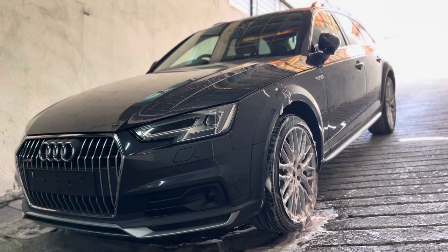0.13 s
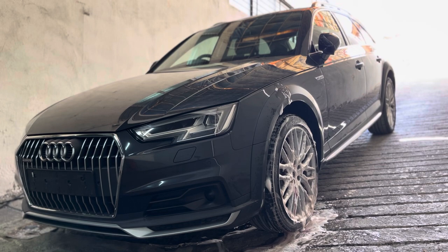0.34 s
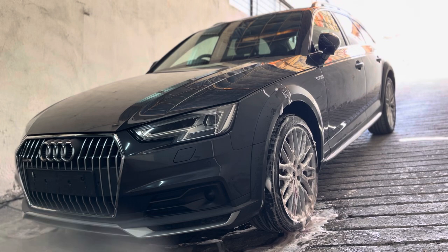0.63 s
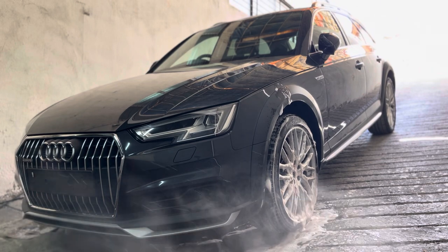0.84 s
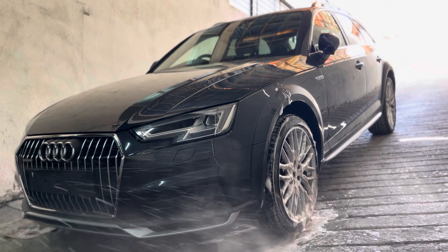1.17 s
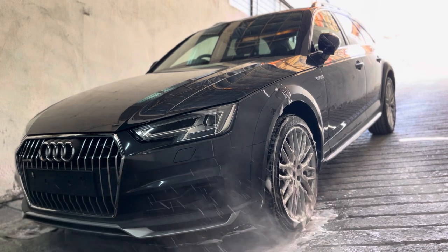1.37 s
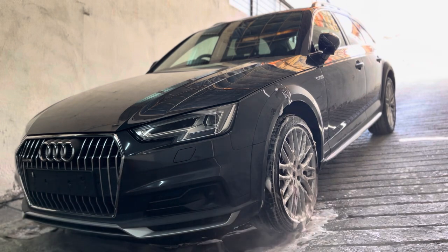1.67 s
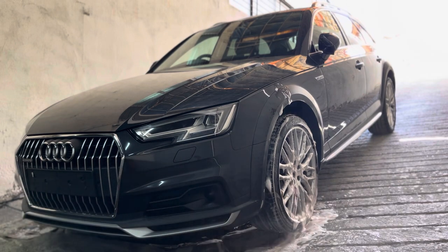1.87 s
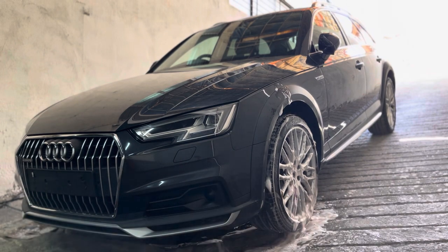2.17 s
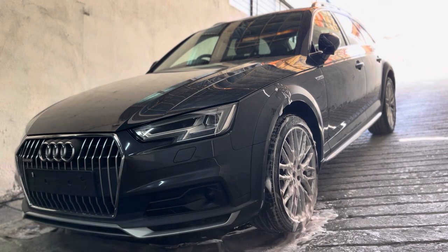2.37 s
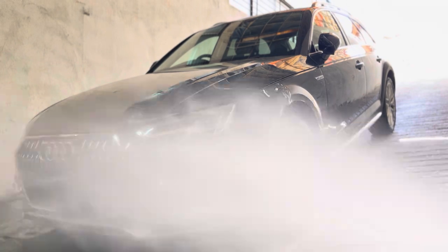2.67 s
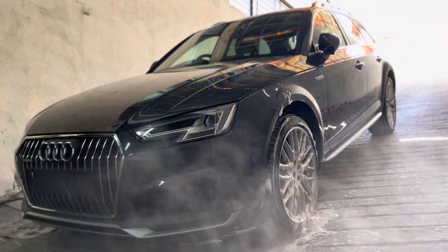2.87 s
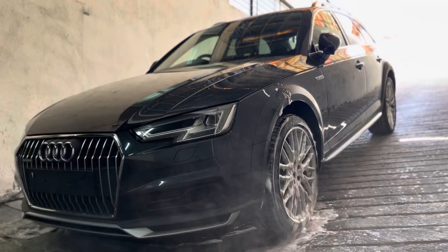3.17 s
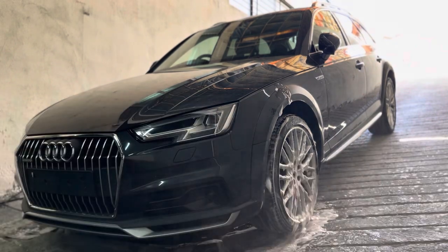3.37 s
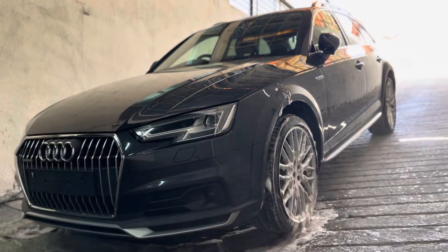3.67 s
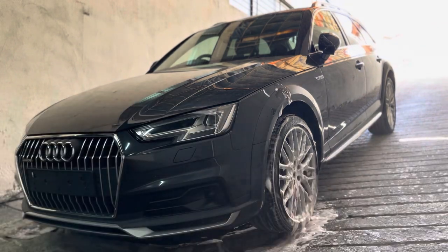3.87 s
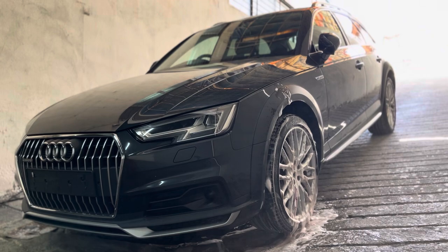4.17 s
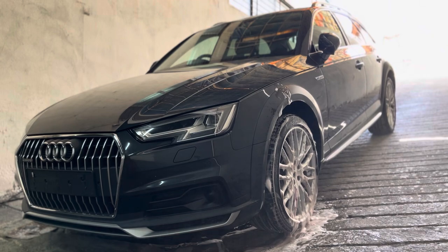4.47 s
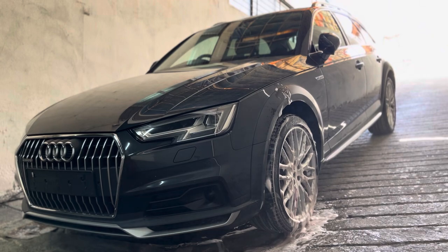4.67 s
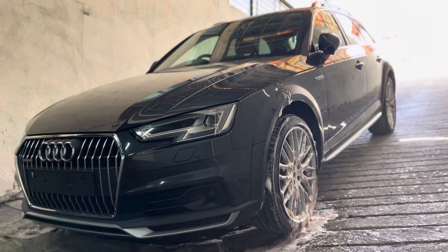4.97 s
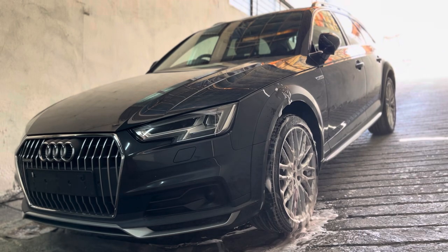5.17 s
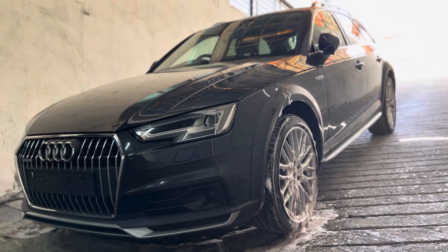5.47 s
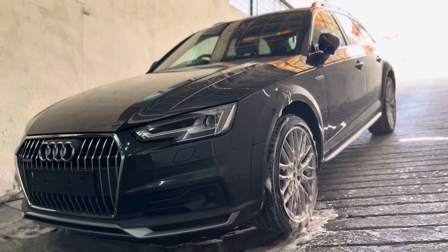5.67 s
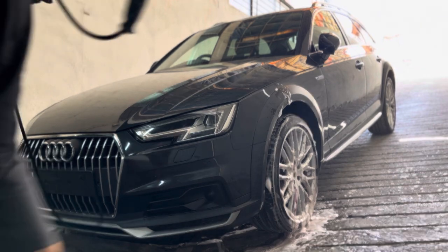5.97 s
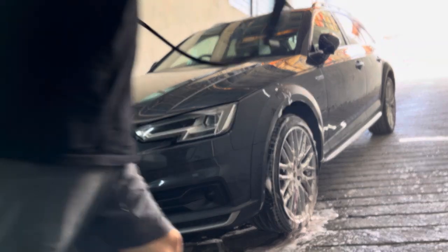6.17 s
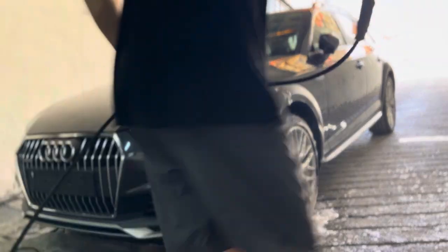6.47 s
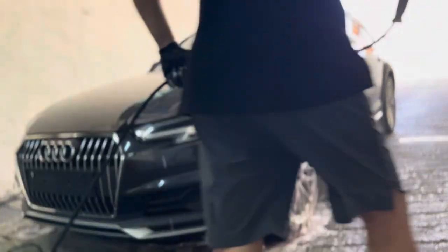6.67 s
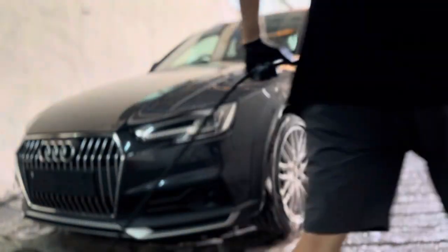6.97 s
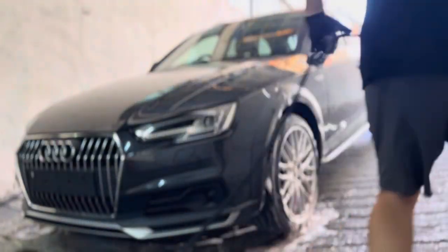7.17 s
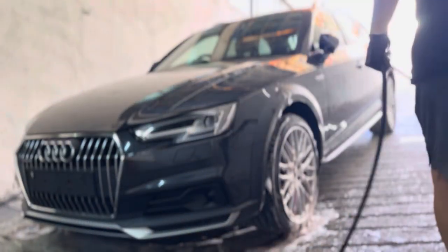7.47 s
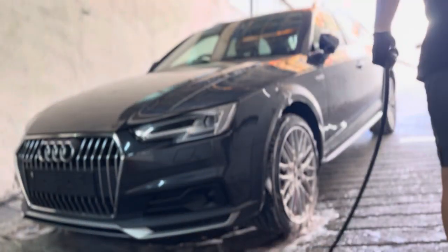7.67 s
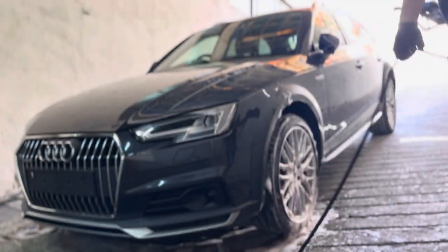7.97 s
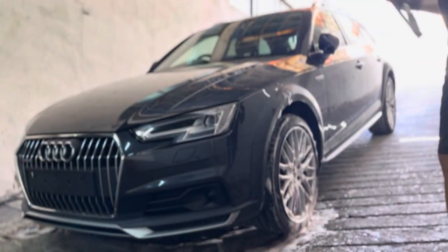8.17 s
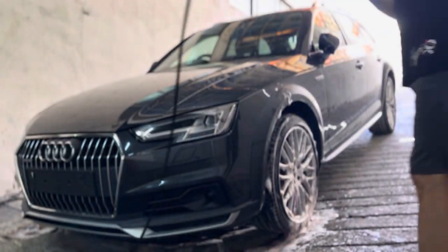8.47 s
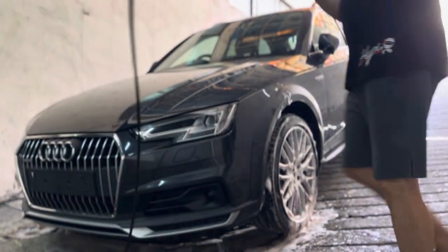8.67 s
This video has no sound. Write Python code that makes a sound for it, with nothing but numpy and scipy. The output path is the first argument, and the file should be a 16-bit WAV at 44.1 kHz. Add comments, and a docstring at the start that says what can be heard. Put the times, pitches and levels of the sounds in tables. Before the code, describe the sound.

Three short pressure-washer blasts hiss and echo in a concrete wash bay, with trigger clicks, then hose knocks and scuffs over faint distant traffic.

```python
"""Covered, echoing wash bay: a pressure washer is triggered in three bursts onto concrete.
Jet and struck floor are coloured noise, the pump is sines on multiples of its shaft speed.
Trigger and lance ring as decaying modes; hose and shoes knock and scuff as filtered noise bursts.
Engines (sines on moving pitches) and road wash pass outside; water trickles faintly.
Sparse taps make the echo; two microphone ports hear the bay with a frequency-dependent lag."""
import sys
import numpy as np
from scipy import signal
from scipy.fft import rfft, irfft, next_fast_len
from scipy.io import wavfile
from scipy.ndimage import uniform_filter1d

SR = 44100
rng = np.random.default_rng(int(sys.argv[2]) if len(sys.argv) > 2 else 0)


def unload_audio(sound):
    """Save the sound as a 16-bit wav file, at the path given as the first command line argument."""
    columns = np.transpose(np.atleast_2d(sound))
    # keep every value between -1 and 1, then stretch to whole-number steps
    steps = np.round(np.clip(columns, -1, 1) * 32767)
    wavfile.write(sys.argv[1], SR, steps.astype(np.int16))


N = 388771

# road wash colour: freq_hz, density_db
ROAD_COLOUR = [(25, -27), (40, -22), (55, 1.5), (100, -9.5), (200, -17.5), (450, -24.5), (700, -26.5),
               (1500, -29.5), (3000, -43), (4400, -36.5), (5600, -48), (10000, -58), (16000, -62.5)]
# road wash level: time_s, level_db
ROAD_LEVEL = [(0, -37.5), (2.5, -33.5), (3.6, -40.5), (8.82, -41)]
# passing car: time_s, speed_hz (its tone sits at 0.98 of this), level_db
CAR = [(0, 77, -39), (1, 77.75, -56.5), (2.2, 76.7, -33.5), (2.8, 71.5, -35), (3.2, 62, -57),
       (3.7, 58.3, -38), (4.5, 57.34, -38.5), (5.3, 60, -32), (5.55, 58, -66), (5.8, 58.92, -34.5),
       (6.4, 58.56, -30.5), (6.95, 58.3, -40.5), (7.25, 56.95, -38), (7.55, 56.2, -43), (8.82, 54.4, -47)]
# passing van: time_s, firing_hz, level_db
VAN = [(0, 46.77, -39.5), (1.2, 47.87, -37.5), (2.4, 42.4, -52), (3.7, 38.24, -39)]
# passing truck: time_s, firing_hz, level_db
TRUCK = [(3.5, 87.4, -60.5), (4.7, 97.44, -52.5), (5.5, 94.1, -42.5), (6.6, 91.44, -41.5), (7.3, 86.3, -50),
         (8.82, 73.4, -57.5)]
# van tones: firing_multiple, level_db
VAN_ORDERS = [(1, -5.5), (2, -3)]
# truck tones: firing_multiple, level_db
TRUCK_ORDERS = [(1, 0), (2, -11)]
# running water and dragged hose, faint hiss: time_s, level_db
TRICKLE = [(0, -64), (.15, -54.5), (.35, -85), (.45, -51.5), (.6, -66), (3.4, -71), (3.62, -58),
           (4.35, -64), (4.55, -57), (4.72, -67.5), (6.8, -70), (6.97, -57.5), (7.15, -80.5)]
# trickle colour: freq_hz, density_db
WATER = [(1500, -5), (3000, 1.5), (4500, 2), (6000, -3.5), (10000, -4), (13000, -4.5)]
# echo decay of the bay: freq_hz, t60_s
BAY = [(120, 2), (330, 1.3), (870, 1.2), (2300, 1.2), (6060, 1), (14000, .66)]
# microphone ports: freq_hz, likeness_0_1, right_lead_half_turns, left_over_right_db
PORTS = [(90, .99, 0, 0), (150, .86, 0, -4), (280, .8, 0, 1), (480, .7, -.05, 1), (850, .55, -.75, 0),
         (1550, .6, -1, -3), (1800, .65, -.22, 2), (4500, .4, -.2, 5), (6000, .5, .35, 4.5),
         (8250, 1, 1, 0), (11800, .92, 2, 0), (14900, 1, 3, 0)]
EDGE_HZ = 15800  # upper band limit

# thin bright ticks, the last an echo off the walls: start_s, peak_db, centre_hz, contact_s
TICKS = [(.449, -35, 10100, 0.0037), (0.469, -30.5, 9400, .004), (1.8727, -25.5, 10700, 0.0037),
         (6.0935, -35, 10740, 0.0051)]
# distant scrapes, mostly off the walls: start_s, peak_db, centre_hz, contact_s
SCRAPES = [(.1, -36, 3690, 0.071), (1.83, -36.5, 3700, 0.049)]
# shoe and hose scuffs on concrete: start_s, peak_db, centre_hz, contact_s
SCUFFS = [(3.788, -32, 2600, 0.012), (4.0679, -21, 3300, 0.02), (4.9691, -34, 4013, 0.014),
          (7.391, -32.5, 4590, 0.03), (7.985, -40.5, 3530, 0.031)]
# metallic taps of lance and hose fittings: start_s, peak_db, centre_hz, contact_s
TAPS = [(5.7458, -28.5, 4150, 0.0035), (5.811, -28, 3885, 0.0058), (6.2495, -14.5, 3350, 0.012),
        (7.899, -24.5, 3365, 0.017), (7.911, -29.5, 4040, 0.0098)]
# hard knocks, and the wall echo of the first at 5.918 s: start_s, peak_db, centre_hz, contact_s
KNOCKS = [(5.7718, -3, 8500, 0.0072), (5.9181, -16.5, 2430, 0.011), (8.4391, -16.5, 1050, 0.0081)]
# low thuds as hose or shoe lands: start_s, peak_db, centre_hz, contact_s
THUDS = [(5.787, -17.5, 330, 0.042), (6.251, -14, 504, 0.01), (7.902, -25.5, 210, .028),
         (8.447, -28.5, 196.9, 0.029)]
# light narrow-band pings, the last a wall echo of the knock at 8.44 s:
# start_s, peak_db, centre_hz, contact_s
PINGS = [(5.6546, -34.5, 2170, .045), (7.268, -34.5, 3800, .0064), (8.5779, -40, 3190, .01)]
# burst kinds: events, fall_below_db_per_octave, fall_above_db_per_octave, swell_db, room_db
KINDS = [(TICKS, 6, 4, -6, -12.5), (SCRAPES, 13, 19, -6, 5.3), (SCUFFS, 3.5, 5.5, 6, -6),
         (TAPS, 2.5, 8.5, -4, -5), (KNOCKS, -1.2, 8, -8, -5.5), (THUDS, 6, 5.5, -3, -1.5),
         (PINGS, 50, 40, -9, -7)]
LOW_EDGE_HZ = 370  # highest bass cut of a crack

# steel tube modes: freq_hz, level_db, t60_s
LANCE = [(1237, -6.5, 0.88), (1834, -10, 0.34), (2175, 0, 0.2), (2320, -6.5, 0.26), (2730, -3, 0.4),
         (3070, -2, 0.44), (3500, 7.5, 0.086), (3960, -1, 0.16), (4740, -7, 0.41)]
# knocks that ring the tube: start_s, level_db
STRUCK = [(5.771, -37.5), (6.251, -28.5)]

# trigger clicks: start_s, level_db
CLICKS = [(0.9048, -19.5), (0.988, -19), (1.954, -13), (2.1968, -17)]
# handle modes, nominal: freq_hz, level_db, t60_s
TRIGGER = [(2600, -2, .009), (3140, 0, .012), (3900, -8, .006)]
# latch chatter: delay_s, level_db
BOUNCES = [(0, -3), (.0026, -5.5), (.0047, -4), (0.01, -18)]
CLICK_ROOM_DB = 2.5

# jet colour: freq_hz, density_db
JET = [(600, -2.5), (1400, -4.5), (1700, -6), (2500, -0.5), (4000, -0.5), (7000, -5), (10000, -3.5),
       (12500, -7), (15000, -7)]
# struck-floor colour: freq_hz, density_db
ROAR = [(120, -19.5), (230, -17), (330, 3.5), (500, -3.5), (800, -6), (1500, -6), (3500, -33)]
# pump tones: shaft_multiple, level_db
PUMP = [(3, 5.5), (6, -8), (7, 3.5), (8, -2.5), (9, 1)]
PUMP_HZ = 46.9  # shaft
# full pulls: on_s, off_s, jet_db, start_db (re full pressure), roar_db (re jet), pump_db (re jet)
PULLS = [(0.495, 0.637, -19, -24, -8, -22), (0.988, 1.094, -19.5, -9.5, -6.5, -24),
         (2.322, 2.642, -17.5, -24, -6, -16)]
# short spits; leftover pressure can start high: on_s, off_s, jet_db, start_db (re full pressure)
SPITS = [(0.899, 1.008, -35.5, 8), (1.95, 1.971, -38, 15.5), (2.048, 2.096, -28, -27.5),
         (2.196, 2.229, -35, 13.5)]
# slack water slapping the floor: on_s, off_s, roar_db
SLACK = [(2.043, 2.172, -33.5), (2.265, 2.318, -33)]
BUILD_S, SPIT_BUILD_S, SLACK_BUILD_S = 0.13, 0.057, 0.12  # pressure build-up
SPIT_ROAR_DB = -13.5  # re jet
SLACK_START_DB, SLACK_HISS_DB = -17, -10  # re full pressure; re roar
# valve slams: start_s, level_db, pitch_hz, t60_s
SHUT = [(0.663, -17, 77, 0.2), (2.648, -15.5, 57, 0.15)]
# dull thumps of water on the floor: start_s, level_db, pitch_hz, t60_s
THUMPS = [(2.143, -16.5, 353, 0.038), (2.292, -16, 322, 0.038)]


def gain_of(db):
    """Decibels to amplitude."""
    return 10 ** (np.asarray(db) / 20)


def evened(x):
    """Scales to rms 1."""
    return x / np.sqrt(np.mean(x ** 2) + 1e-20)


def read(points, hz):
    """Table columns interpolated on a log-frequency axis."""
    f, *values = np.transpose(points)
    return np.squeeze([np.interp(np.log(hz + 1), np.log(f + 1), v) for v in values])


def along(rows):
    """Start time and the columns of a curve, one value a sample."""
    s, *columns = np.transpose(rows)
    t = np.arange(s[0], s[-1], 1 / SR)
    return s[0], [np.interp(t, s, c) for c in columns]


def level_curve(rows):
    """Amplitude from a level table, last value held to the end."""
    level = gain_of(along(rows)[1][0])
    return np.pad(level, (0, N), "edge")[:N]


def add(mix, start_s, sound):
    """Mixes a sound in at start_s."""
    part = mix[..., max(round(start_s * SR), 0):][..., :sound.shape[-1]]
    part += sound[..., :part.shape[-1]]


def wander(length, rate_hz):
    """Smoothed noise of rms 1."""
    step = max(int(SR / rate_hz), 1)
    smooth = uniform_filter1d(rng.standard_normal(length), step)
    return evened(uniform_filter1d(smooth, step))


def noise(spectrum, patchy_db, size):
    """Two unrelated noises of one colour, sharing drifting patches in time and frequency."""
    frames, hz = N * 4 // size + 5, np.fft.rfftfreq(size, 1 / SR)
    a, b, c, d, patches = rng.standard_normal((frames, len(hz), 5)).T
    patches = evened(uniform_filter1d(uniform_filter1d(patches, 8, 0), 12, 1))
    colour = gain_of(read(spectrum, hz)[:, None] + patchy_db * patches)
    bins = np.array([a + 1j * b, c + 1j * d]) * colour
    return evened(signal.istft(bins, nperseg=size, noverlap=size * 3 // 4)[1][:, :N])


def orders(hz, table, waver_db):
    """Sines on multiples of a speed curve, each wavering in level by itself."""
    turns = np.cumsum(hz) / SR
    total = np.zeros(len(hz))
    for multiple, db in table:
        level = gain_of(db + waver_db * wander(len(hz), 4.6))
        total += level * np.sin(2 * np.pi * (multiple * turns + rng.random()))
    return np.sqrt(2) * total


def street():
    """Road wash as coloured noise; engines as firing tones with unsteady pitch."""
    out = level_curve(ROAD_LEVEL) * noise(ROAD_COLOUR, patchy_db=0.9, size=2048)
    for rows, table in ((CAR, [(0.98, 0.0036)]), (VAN, VAN_ORDERS), (TRUCK, TRUCK_ORDERS)):
        start_s, (hz, db) = along(rows)
        hz = hz * (1 + 0.01232 * wander(len(hz), 7.48))
        fade = signal.windows.tukey(len(hz), 0.03)
        add(out, start_s, gain_of(db) * orders(hz, table, waver_db=4.0) * fade)
    return out


def trickle():
    """Faint patchy water hiss; fast level flicker gives fine drops."""
    drops = gain_of(2.5 * wander(N, 150))
    return level_curve(TRICKLE) * drops * noise(WATER, patchy_db=2.0, size=256)


def bay(x):
    """Echo: sparse taps of random sign, each band dying at its own rate."""
    taps = np.zeros((2, 2 * SR))
    at = np.arange(300, 2 * SR - 20, 20) + rng.integers(0, 20, (2, (2 * SR - 301) // 20))
    np.put_along_axis(taps, at, rng.choice([-1., 1.], at.shape), 1)
    hz, t, z = signal.stft(taps, SR, nperseg=256)
    decay = gain_of(-60 * t / read(BAY, hz)[:, None])
    tail = signal.istft(z * decay, SR, nperseg=256)[1]
    early = np.exp(-np.arange(tail.shape[1]) / (0.15 * SR))  # first echoes come in lumps
    tail = tail * gain_of([2.5 * early * wander(len(early), 160) for port in "LR"])
    tail = tail / np.linalg.norm(tail[0])
    return signal.fftconvolve(x[None], tail, axes=1)[:, :N]


def knocks():
    """Rattling noise cracks, each held for its contact time; returns direct sound and bay feed."""
    t, hz = np.arange(8192) / SR, np.fft.rfftfreq(8192, 1 / SR)
    direct, sent = np.zeros((2, N)), np.zeros(N)
    events = [(*row, *kind) for rows, *kind in KINDS for row in rows]
    for start_s, peak_db, centre_hz, contact_s, below_db, above_db, swell_db, room_db in events:
        octaves = np.log2((hz + 1) / centre_hz)
        slope_db = np.where(octaves < 0, below_db, above_db)
        bass_cut = 1 + (min(LOW_EDGE_HZ, centre_hz / 2) / (hz + 1)) ** 4
        colour = gain_of(-abs(octaves) * slope_db) / bass_cut
        crack = irfft(rfft(rng.standard_normal((2, len(t)))) * colour)
        rattle = gain_of(3.2 * wander(len(t), 400))  # uneven contact
        rise = np.minimum(t / (0.0013 + 4 * contact_s ** 2), 1)  # long contacts start softly
        swell = gain_of(swell_db * np.minimum(t / contact_s, 1))
        fade = np.exp(-np.maximum(t - contact_s, 0) / (0.0034 + 0.064 * contact_s))
        sound = crack * rattle * rise * swell * fade
        sound = gain_of(peak_db) * sound / abs(sound).max(1, keepdims=True)
        add(direct, start_s, sound)
        # the bay is fed the smooth colour, levelled from the knock
        whole = rfft(sound[0])
        smooth = irfft(colour * whole / (abs(whole) + 1e-12))
        add(sent, start_s, gain_of(room_db) * evened(smooth) * np.std(sound[0]))
    return direct, sent


def lance():
    """Struck tube modes decay; rattling against the fittings blurs each one."""
    t, out = np.arange(SR // 2) / SR, np.zeros((2, N))
    for start_s, blow_db in STRUCK:
        for hz, db, t60_s in LANCE:
            blur_hz = 0.17 * hz
            blur = [wander(len(t), blur_hz) + 1j * wander(len(t), blur_hz) for port in "LR"]
            rattle = 0.5 + np.array(blur)
            tone = (rattle * np.exp(2j * np.pi * hz * t)).imag
            add(out, start_s, gain_of(blow_db + db - 60 * t / t60_s) * tone)
    return out


def trigger():
    """Latch snaps and bounces; each contact rings the handle modes a little differently."""
    t, out, sent = np.arange(3000) / SR, np.zeros(N), np.zeros(N)
    for start_s, click_db in CLICKS:
        for delay_s, bounce_db in BOUNCES:
            ring = np.zeros(len(t))
            for hz, db, t60_s in TRIGGER:
                level_vary, pitch_vary = rng.standard_normal(2)
                level = gain_of(db + 2.2 * level_vary - 60 * t / t60_s)
                ring += level * np.sin(2 * np.pi * hz * (1 + 0.027 * pitch_vary) * t)
            ring *= np.minimum(t / 0.00088, 1)
            ring /= abs(ring).max()
            add(out, start_s + delay_s, gain_of(click_db + bounce_db) * ring)
        # walls hear the bare snap: the last ring, cut short
        add(sent, start_s, gain_of(click_db + CLICK_ROOM_DB) * ring * np.exp(-t / 0.0016))
    return out, sent


def washer():
    """Sputtering jet hiss, floor roar, pump under load, low blows; returns spray and pump."""
    hiss = noise(JET, patchy_db=1.0, size=512) * gain_of(1.4 * wander(N, 73))
    roar = noise(ROAR, patchy_db=2.6, size=512)
    spray, drone = np.zeros((2, N)), np.zeros(N)

    def flow(on_s, off_s, jet_db, roar_db, build_s, start_db):
        """One valve opening; returns its pressure and the time since closing."""
        t = np.arange(0, off_s - on_s + 0.2, 1 / SR)
        at = slice(round(on_s * SR), round(on_s * SR) + len(t))
        build = gain_of(start_db * np.maximum(1 - t / build_s, 0) ** 1.83)
        pressure = build * np.minimum(t / 0.0088, 1)
        closed = np.maximum(t - (off_s - on_s), 0)
        add(spray, on_s, pressure * gain_of(jet_db) * hiss[:, at] * np.exp(-closed / 0.0014))
        # the sheet of water stops later
        add(spray, on_s, pressure * gain_of(roar_db) * roar[:, at] * np.exp(-closed / 0.087))
        return pressure, closed

    for on_s, off_s, jet_db, start_db, roar_db, pump_db in PULLS:
        pressure, closed = flow(on_s, off_s, jet_db, jet_db + roar_db, BUILD_S, start_db)
        tones = orders(np.full(len(closed), PUMP_HZ), PUMP, waver_db=4.0)
        load = pressure ** 2 * np.exp(-closed / 0.065)
        add(drone, on_s, gain_of(jet_db + pump_db) * load * tones)
    for on_s, off_s, jet_db, start_db in SPITS:
        flow(on_s, off_s, jet_db, jet_db + SPIT_ROAR_DB, SPIT_BUILD_S, start_db)
    for on_s, off_s, roar_db in SLACK:
        flow(on_s, off_s, roar_db + SLACK_HISS_DB, roar_db, SLACK_BUILD_S, SLACK_START_DB)
    t = np.arange(SR // 2) / SR
    for start_s, db, hz, t60_s in SHUT + THUMPS:  # low blows that ring briefly
        level = gain_of(db - 60 * t / t60_s) * (1 - np.exp(-t / 0.0019))
        add(spray, start_s, level * np.sin(2 * np.pi * hz * t))
    return spray, drone


def scene():
    """Sums direct sources, their echo and the background at two pick-ups."""
    background = street() + trickle()
    direct, sent = knocks()
    ring = lance()
    clicks, snaps = trigger()
    spray, pump = washer()
    to_bay = snaps + sent + gain_of(-7.5) * ring[0]
    to_bay = to_bay + gain_of(-4.0) * spray[0] + gain_of(-16.5) * pump
    return background + direct + ring + clicks + spray + pump + bay(to_bay)


def record(dry):
    """Right port mixes the left's sound with its own share, turned in phase; band-limited."""
    size = next_fast_len(N + SR)
    hz = np.fft.rfftfreq(size, 1 / SR)
    left, own = rfft(dry, size) / np.sqrt(1 + (23.0 / (hz + 1)) ** 8)  # bass roll-off
    same, half_turns, balance_db = read(PORTS, hz)
    same = np.clip(same, 0, 1)
    right = same * left + np.sqrt(1 - same ** 2) * own
    right = right * np.exp(1j * np.pi * half_turns) / gain_of(balance_db)
    pair = irfft([left, right], size)[:, :N]
    low_pass = signal.firwin(511, EDGE_HZ, window=("kaiser", 9), fs=SR)
    return signal.oaconvolve(pair, low_pass[None], "same")


dry = scene()
out = record(dry)
unload_audio(out)
```